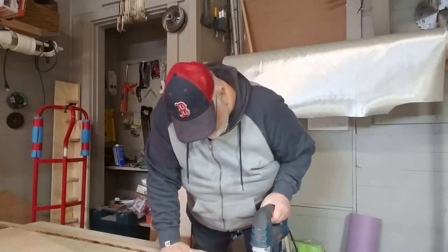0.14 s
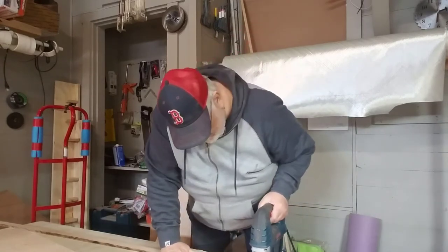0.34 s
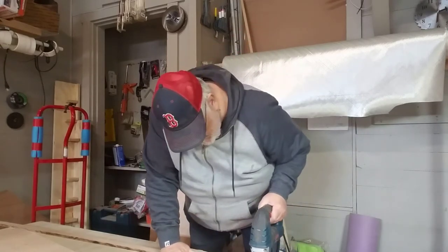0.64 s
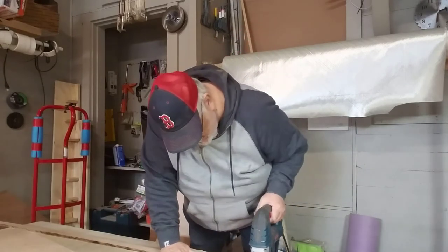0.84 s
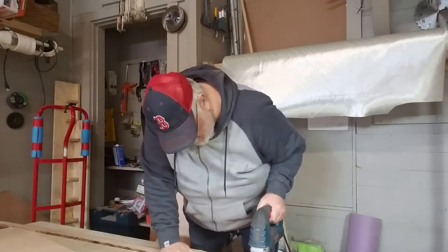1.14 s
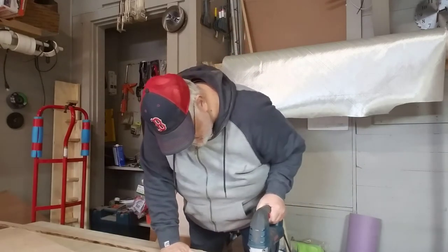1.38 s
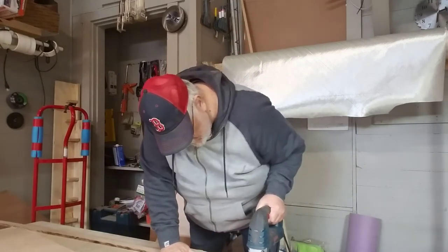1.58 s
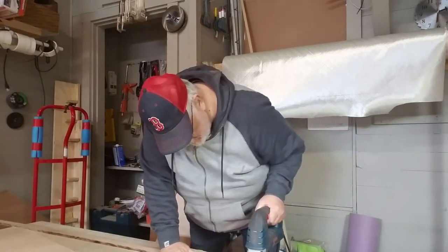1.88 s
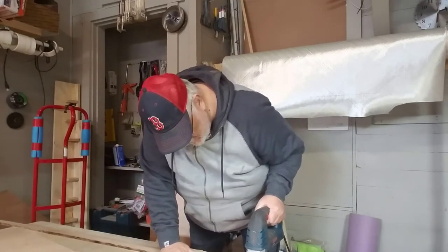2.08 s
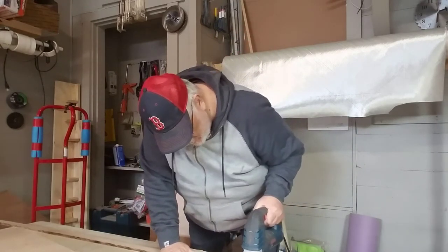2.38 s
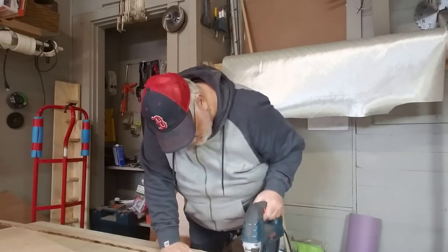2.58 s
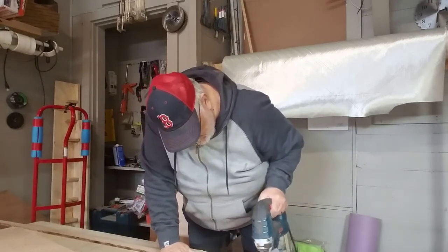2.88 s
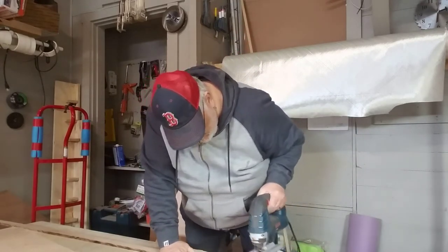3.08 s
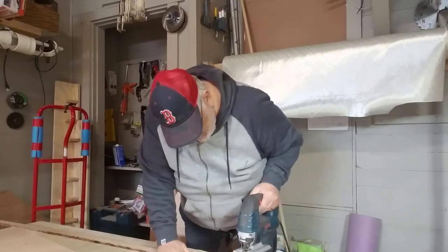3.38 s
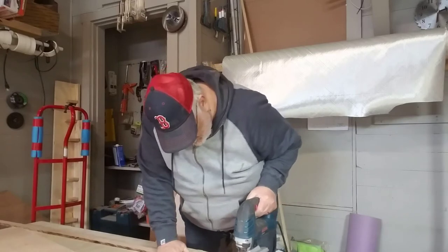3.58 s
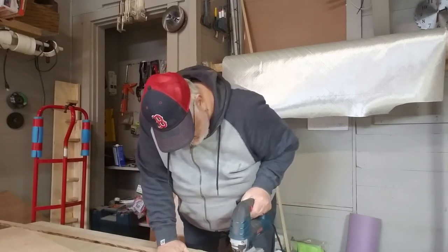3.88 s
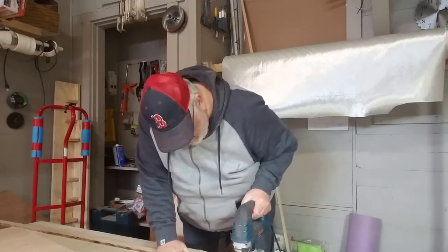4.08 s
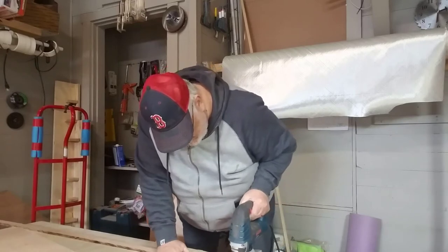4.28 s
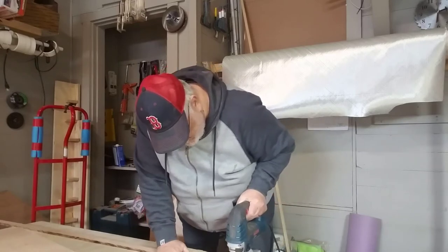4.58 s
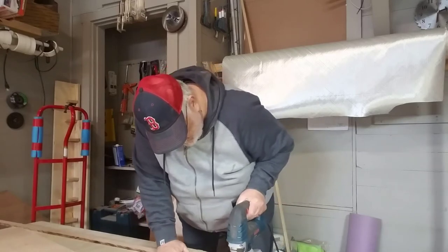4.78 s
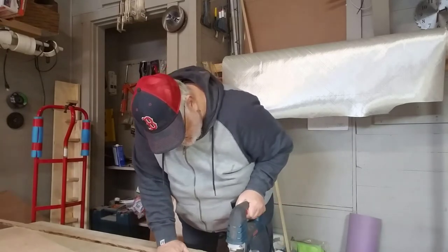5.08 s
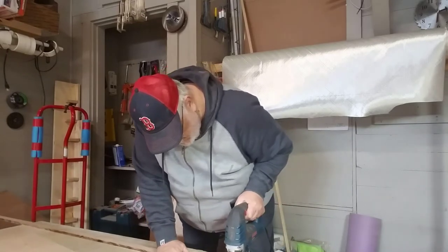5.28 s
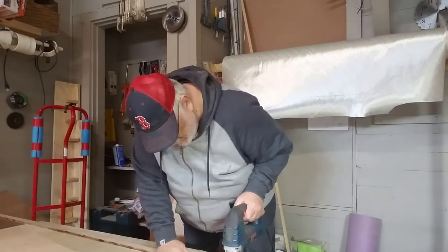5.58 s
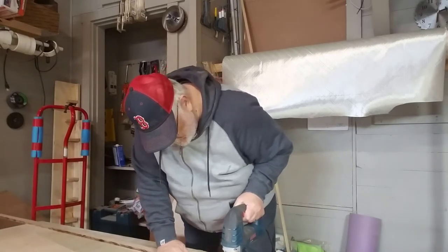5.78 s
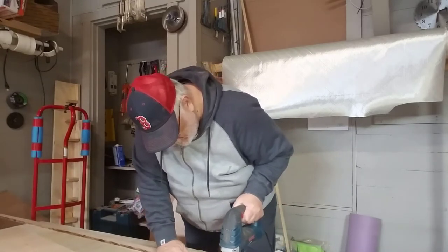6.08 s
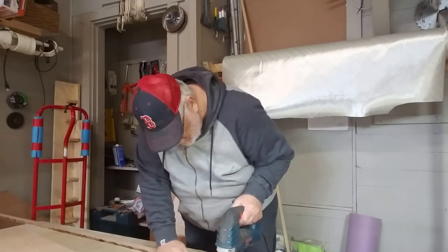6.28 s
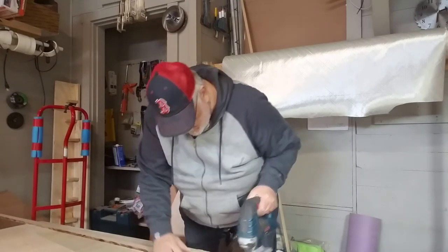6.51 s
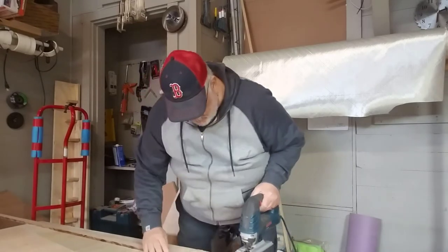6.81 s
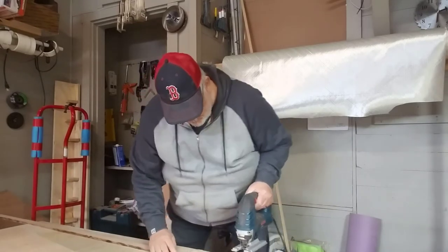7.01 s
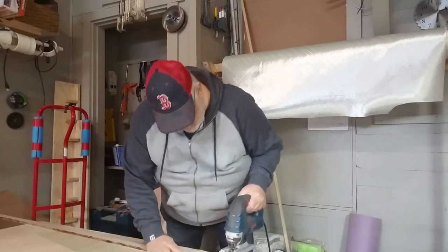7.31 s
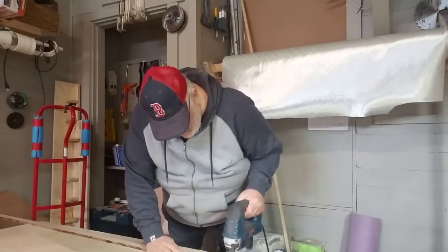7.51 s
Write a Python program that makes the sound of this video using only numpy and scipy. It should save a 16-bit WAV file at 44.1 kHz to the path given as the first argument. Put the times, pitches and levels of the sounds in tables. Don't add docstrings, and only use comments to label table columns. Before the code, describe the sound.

A close stereo pickup in a moderately echoing garage begins with faint room air and a barely audible high lamp tone. At about 0.85 s a jigsaw snaps on, biting wood with a loud, rough buzz, rapid blade chatter, fan hiss and brief squeals, rising slightly in pitch until 2.55 s. The offcut drops with a dense wooden clatter and low bench boom until 2.8 s, while the motor rattles and whines downward. Light shoe touches come at 3.3 s, heavier set-down knocks at 3.8 and 4.1 s, then fading settling taps from 4.4 to 4.8 s. A near-quiet pause ends around 4.95 s with a hard kick and a second rasping cut, squealing and jolting near 6.0 s. It stops at 6.35 s; a small scrap knocks and is quickly stilled, the motor winds down, and the shoe taps the bench at 7.3 s.

```python
import sys
import numpy as np
from scipy import signal
from scipy.fft import rfft, irfft, next_fast_len
from scipy.io import wavfile

SR = 44100
rng = np.random.default_rng(int(sys.argv[2]) if len(sys.argv) > 2 else 0)


def bounce(signal):
    frames = np.transpose(np.atleast_2d(signal))
    limited = np.clip(frames, -1, 1)
    pcm = np.round(limited * 32767).astype(np.int16)
    wavfile.write(sys.argv[1], SR, pcm)


def gain_from_decibels(decibels):
    exponent = np.asarray(decibels, float) / 20
    return 10 ** exponent


N = 337360

GEAR_TEETH, PINION_TEETH, ROTOR_SLOTS = 41, 4, 38
ROTOR_PER_STROKE = GEAR_TEETH / PINION_TEETH
# [t/s, level/dB]
CUTS = [
    [(.8, -64), (.832, -52), (.852, -20), (.954, -21), (1.11, -18), (1.866, -18.5), (2.55, -24)],
    [(4.964, -62), (4.982, -15), (5.032, -32), (5.04, -18.5), (5.388, -18), (5.896, -19.5), (6.058, -17.5),
     (6.074, -20), (6.352, -25)],
]
# [pulled t/s, released t/s, run-up time/s]
RUNS = [
    (.833, 2.575, .15),
    (4.932, 6.335, .13),
]


def clock():
    return np.arange(N) / SR


def rms_one(x):
    return x / np.sqrt(np.mean(x ** 2) + 1e-20)


def in_time(spans):
    gain = 0
    for span in spans:
        times, levels = np.transpose(span)
        gain = gain + gain_from_decibels(np.interp(clock(), times, levels, left=-200, right=-200))
    return gain


def at_hz(points, hz):
    points = np.array(points)
    return np.interp(np.log(hz + 1), np.log(points[:, 0]), points[:, 1])


def colour(x, spectrum):
    size = next_fast_len(N)
    gain = gain_from_decibels(at_hz(spectrum, np.fft.rfftfreq(size, 1 / SR)))
    return irfft(rfft(x, size) * gain, size)[..., :N]


def drift(rate_hz):
    r = np.exp(-2 * np.pi * rate_hz / SR)
    noise = rng.standard_normal(N + SR)
    return rms_one(signal.lfilter([1], [1, -2 * r, r * r], noise)[SR:])


def resonance(x, hz, width):
    r = np.exp(-np.pi * width / SR)
    poles = [1, -2 * r * np.cos(2 * np.pi * hz / SR), r * r]
    return signal.lfilter([(1 - r * r) / 2, 0, (r * r - 1) / 2], poles, x)


def ring(clicks, hz, t60):
    r, w = gain_from_decibels(-60 / (t60 * SR)), 2 * np.pi * hz / SR
    return signal.lfilter([0, np.sin(w)], [1, -2 * r * np.cos(w), r * r], clicks + 1e-18)


def rough_tone(turns, width):
    return drift(width) * np.cos(2 * np.pi * turns) + drift(width) * np.sin(2 * np.pi * turns)


def chips(strokes, per_s, upstroke, spread_db):
    beat = 1 + upstroke * np.cos(2 * np.pi * strokes) + 0.36 * np.cos(4 * np.pi * strokes + 1)
    sizes = gain_from_decibels(spread_db * np.minimum(rng.exponential(1, N), 4)) * rng.choice([-1, 1], N)
    return np.maximum(beat, 0) * sizes * (rng.random(N) < per_s / SR)


def garage():
    # [f/Hz, t60/s]
    room_t60 = [(100, 0.21), (500, 0.52), (2000, 0.47), (8000, 0.39)]
    t, echo = np.arange(SR // 2) / SR, 0
    for hz in 44 * 2. ** np.arange(9):
        band = signal.butter(2, [hz / np.sqrt(2), hz * np.sqrt(2)], "band", fs=SR, output="sos")
        noise = signal.sosfilt(band, rng.standard_normal((2, 2, len(t))))
        echo = echo + noise * gain_from_decibels(-60 * t / at_hz(room_t60, hz))
    return echo / np.sqrt(np.sum(echo ** 2) / 4) * np.clip(t / .006, 0, 1)


def placed(x, echo, wet_db):
    # [f/Hz, side minus mid level/dB]
    spread = [(60, -26), (110, -33), (200, -19.5), (380, -9.5), (700, -6), (1290, -1.5), (2380, -2.5),
              (4400, -2), (8120, 0.5), (15000, -0.5)]
    turn = 2 * np.pi * 2.6 * clock()
    moving = x * np.array([[np.cos(turn)], [np.sin(turn)]])
    wet = signal.fftconvolve(moving, echo, axes=2)
    mid, side = wet.sum(axis=0)[:, :N] * gain_from_decibels(wet_db)
    side = colour(side, spread) * np.sqrt(1 + gain_from_decibels(-2 * wet_db))
    return np.array([x + mid + side, x + mid - side]) / np.sqrt(1 + gain_from_decibels(2 * wet_db))


def speed():
    free, friction = 55.5, 34
    quick_share, creep_s, coast_s = .792, 1.657, 2.053
    out = np.zeros(N)
    for on, off, quick_s in RUNS:
        t = np.clip(clock(), on, off) - on
        lag = quick_share * np.exp(-t / quick_s) + (1 - quick_share) * np.exp(-t / creep_s)
        drag = np.exp(-np.maximum(clock() - off, 0) / coast_s)
        out += np.maximum((free * (1 - lag) + friction) * drag - friction, 0)
    return out + 1e-3


def load_surge():
    surges = [-6, 10]
    surge_s = .45
    out = np.zeros(N)
    for (on, _, _), db in zip(RUNS, surges):
        out += db * np.exp(-np.maximum(clock() - on, 0) / surge_s) * (clock() > on)
    return out


def feed_over_light(feed):
    return feed / gain_from_decibels(-25.5)


def room_floor(echo):
    # [f/Hz, level/dB]
    air_spectrum = [(15, -28), (25, 2), (128, -16), (237, -10), (488, -16), (637, -22), (1210, -21),
                    (7090, -36), (9770, -42), (11200, -35), (15000, -39)]
    air = rms_one(colour(rng.standard_normal(N), air_spectrum))
    ballast = gain_from_decibels(-92) * rough_tone(11200 * clock(), 30)
    return gain_from_decibels(-66.8) * placed(air, echo, wet_db=6) + ballast


def thuds():
    # [t/s, peak level/dB, f/Hz, t60/s]
    booms = [
        (2.58, -36, 61.5, 0.7),
        (2.78, -44, 74, 0.88),
        (3.311, -41, 100, 0.48),
        (3.77, -33.5, 74.6, 0.99),
        (4.114, -37, 70.7, 0.61),
        (6.36, -60, 78, 0.33),
        (7.32, -42, 61, 0.67),
        (7.352, -39, 106, .4),
    ]
    out = np.zeros(N)
    for s, db, hz, t60 in booms:
        t = np.maximum(clock() - s, 0)
        out += gain_from_decibels(db - 60 * t / t60) * (1 - np.exp(-t / 0.0057)) * np.sin(2 * np.pi * hz * t)
    return out


def shake(strokes):
    # [centre t/s, half length/s, level/dB]
    strong_swells = [
        [(1.85, .3, -53), (5.92, 0.21, -49.5)],
        [(1.35, 0.17, -50), (1.9, 0.16, -49.5), (2.3, 0.1, -47), (5.3, 0.18, -45.5), (5.72, .22, -37.5)],
        [(1.85, 0.19, -40.5), (2.3, 0.087, -39), (5.22, .07, -31.5), (5.5, 0.18, -38.5), (5.95, 0.12, -35.5)],
        [(1.32, .14, -32.5), (1.69, 0.042, -41), (2.29, 0.09, -42), (5.3, 0.2, -35), (5.68, 0.082, -35.5)],
        [(1.49, 0.051, -34), (1.78, .16, -38), (2.28, .25, -38), (5.42, .17, -32.5), (6.16, 0.093, -35.5),
         (6.33, 0.035, -40)],
    ]
    # [multiple of the stroke, level/dB]
    weak_lines = [(2, -63.5), (3, -68.5), (5, -51.5), (8, -52.5), (9, -54), (10, -47.5), (11, -54.5),
                  (12, -42), (13, -45.5), (14, -45.5)]
    fall_db = 8
    out, t = 0, clock()[::100]
    for k, swells in zip([1, 4, 6, 7, ROTOR_PER_STROKE], strong_swells):
        gain = sum(gain_from_decibels(db - fall_db * ((t - s) / half) ** 2) for s, half, db in swells)
        line = np.sin(2 * np.pi * k * strokes) + 0.39 * rough_tone(k * strokes, 8.8)
        out = out + np.interp(clock(), t, gain) * line
    weak = sum(gain_from_decibels(db - 6.5) * rough_tone(k * strokes, 5.6) for k, db in weak_lines)
    turning = np.clip(np.gradient(strokes) * SR / 28, 0, 1)
    return gain_from_decibels(1.0) * out + weak * rms_one(in_time(CUTS)) * turning


def knocks():
    # [t/s, peak level/dB, crack level/dB, ring f/Hz]
    offcut = [(2.556, -14, 11, 235), (2.579, -8, -6, 321), (2.599, -16, 6, 217), (2.624, -9, -5, 334),
              (2.647, -9.5, -7, 192), (2.664, -11.5, -13, 468), (2.689, -16.5, -20, 281),
              (2.736, -25.5, 14.5, 248), (2.754, -15.5, -8, 310), (2.801, -24, -10, 204),
              (2.829, -31, -11, 495), (6.359, -12.5, 5, 214), (6.374, -11, 5, 223),
              (6.399, -20.5, 12.5, 228), (6.431, -23, 0, 214), (6.459, -27, 10, 215), (6.5, -19.5, -8, 215)]
    shoe = [
        (3.307, -30.5, -8, 173),
        (3.351, -28.5, -4, 193),
        (7.311, -33.5, -13.5, 143.8),
        (7.334, -22.5, -23, 153),
        (7.354, -30, -15, 158),
        (7.379, -29.5, -12, 191),
    ]
    set_down = [
        (3.766, -24.5, 6, 215),
        (3.816, -25, -3, 460),
        (3.832, -18.5, -2, 475),
        (3.855, -16, 5, 507),
        (4.102, -30, -8, 300),
        (4.114, -13, -2, 372),
        (4.13, -17, -8, 480),
    ]
    settle = [
        (4.409, -33, -3, 307),
        (4.432, -36, -14, 322),
        (4.472, -41, -21.5, 292),
        (4.523, -47.5, -22, 308),
        (4.716, -54, -26, 220),
        (4.745, -55, -26, 290),
        (4.773, -55, -25, 200),
        (4.819, -56, -22, 290),
    ]
    kick = [
        (.85, -29, -12, 180),
        (4.982, -12, -6, 310),
        (5.038, -17, 5, 365),
        (5.076, -17.5, 4, 324),
        (5.106, -17, -.5, 370),
    ]
    # [treble level/dB, t60/s, ring level/dB, rise/s]
    offcut_sound = (-8, .125, -2.5, 0)
    shoe_sound = (-2, 0.09, -2.5, .003)
    set_down_sound = (-16, 0.14, -5, -0.02)
    settle_sound = (-11, .14, 2, .001)
    kick_sound = (4.3, .15, -5, .001)
    # [f/Hz, level/dB, t60/s]
    wood = [(215, -0.5, 1.2), (468, 5, 0.58), (657, -21, 2.2), (1060, -11, 0.66), (1293, -24, 0.22),
            (1890, -12.5, 0.99)]
    families = [(offcut, offcut_sound), (shoe, shoe_sound), (set_down, set_down_sound),
                (settle, settle_sound), (kick, kick_sound)]
    registers = [[110, 780], [480, 1630], [1500, 4070]]
    low, mid, high = [signal.butter(2, edges, "band", fs=SR, output="sos") for edges in registers]
    out, t = np.zeros(N), np.arange(SR // 2) / SR
    push = np.exp(-t / 0.0005) / 18
    crack = 1 + 1.2 * np.exp(-t / .005)
    blows = [tuple(row) + tuple(sound) for rows, sound in families for row in rows]
    for s, db, crack_db, hz, treble_db, t60, ring_db, rise in blows:
        t60 = max(t60, .02)
        grit = rng.standard_normal(len(t)) * gain_from_decibels(-60 * t / t60) * (1 - np.exp(-t / max(rise, 1e-4)))
        body = signal.sosfilt(low, grit)
        blow = gain_from_decibels(6) * body + gain_from_decibels(crack_db + 1.5) * signal.sosfilt(mid, grit * crack)
        blow += gain_from_decibels(treble_db - 8) * signal.sosfilt(high, grit)
        blow += gain_from_decibels(ring_db) * ring(body / 40 + push, hz, .45 * t60)
        for (m_hz, m_db, m_t60), luck_db in zip(wood, rng.normal(0, 2.2, len(wood))):
            blow += gain_from_decibels(crack_db + m_db + luck_db - 17.0) * ring(push, m_hz, min(m_t60, .07))
        at = round(s * SR)
        out[at:at + len(t)] += gain_from_decibels(db + 1) * blow[:N - at]
    thin = signal.butter(3, 115, "high", fs=SR, output="sos")
    return signal.sosfilt(thin, out)


def squeals(strokes):
    # [start t/s, end t/s, f/Hz, level/dB]
    songs = [(.845, .96, 312, -25), (.846, 0.923, 970, -28.5), (.855, .925, 2553, -26),
             (.986, 1.096, 2580, -28), (1.043, 1.197, 4880, -32), (1.063, 1.154, 3060, -33.5),
             (1.144, 1.455, 1843, -33), (1.3, 1.577, 3890, -32), (1.394, 1.596, 983, -33),
             (1.823, 1.99, 4320, -27.5), (1.845, 2.216, 3990, -31), (3.402, 3.787, 697, -49.5),
             (3.45, 3.59, 2200, -43), (4.975, 5.072, 311, -32), (4.975, 5.2, 383.7, -34),
             (5.03, 5.16, 2500, -27.5), (5.23, 5.3, 2500, -34), (5.28, 5.56, 3870, -45),
             (5.923, 6.085, 4200, -29), (5.95, 6.092, 4880, -33.5), (6.378, 6.516, 211.4, -33),
             (7.552, 7.608, 2100, -45)]
    out = np.zeros(N)
    for start, end, hz, db in songs:
        a, b = round(start * SR), round(end * SR)
        width = .055 * hz
        rub = rng.standard_normal(SR)[:b - a] * (1 + 0.45 * np.cos(2 * np.pi * strokes[a:b]))
        song = rms_one(resonance(resonance(rub, hz, width), hz, width))
        out[a:b] += gain_from_decibels(db) * song * signal.windows.tukey(b - a, .4)
    return out


def blows_and_squeals(strokes, echo):
    drop_s, drop_for_s, drop_db = 6.525, .7, -15
    lowered = np.clip((clock() - drop_s) / 0.024, 0, 1) * (clock() < drop_s + drop_for_s)
    return gain_from_decibels(drop_db * lowered) * placed(knocks() + squeals(strokes), echo, wet_db=-1.5)


def mesh(strokes, multiple, width):
    band = rough_tone(multiple * GEAR_TEETH * strokes, width)
    return rms_one(band * (1 + 0.3 * np.cos(2 * np.pi * strokes)))


def rattle(strokes):
    # [f/Hz, level/dB per Hz]
    gearbox = [(65, -50), (110, -31), (249, -18.5), (442, -9), (535, -9.5), (682, -3.5), (1110, -7.5),
               (1490, -3), (3200, -2.5), (3950, -17), (7000, -34.5), (9100, -19), (15400, -120)]
    let_go_db, let_go_s = 7, 0.22
    out = rms_one(colour(chips(strokes, per_s=9000, upstroke=0.19, spread_db=4.5), gearbox))
    out += gain_from_decibels(-11.5) * (mesh(strokes, 0.99, width=73) + 0.36 * mesh(strokes, 2.2, width=86))
    let_go = np.zeros(N)
    for on, off, _ in RUNS:
        let_go += let_go_db * np.exp(-np.maximum(clock() - off, 0) / let_go_s) * (clock() > on)
    return gain_from_decibels(1.0 + let_go) * out


def fan_hiss(strokes, rate):
    # [f/Hz, level/dB per Hz]
    air_rush = [(2350, -11.5), (4000, -2.5), (4610, -4), (8390, -9), (9400, -11), (13100, -6.5),
                (15100, -5.5), (15600, -21.5)]
    hiss = rms_one(colour(chips(strokes, per_s=20000, upstroke=0.08, spread_db=5.0), air_rush))
    slack = np.clip(1 - rate / 30, 0, 1)
    top = signal.sosfilt(signal.butter(1, 7000, "high", fs=SR, output="sos"), hiss)
    return hiss - 0.85 * slack * top


def fan_gain(rate, feed, coast):
    # [t/s, level/dB]
    jolts = [
        (.85, -28.5),
        (.935, -33),
        (4.109, -35.5),
        (4.409, -65),
        (4.98, -39),
        (6.0, -26),
    ]
    jolt_t60 = 0.4
    over = feed_over_light(feed)
    powered = gain_from_decibels(-26.5 - .3 * load_surge() + 26.5 * np.log10(rate / 50))
    powered = np.minimum(over, 1) * powered / np.maximum(over, 1) ** 0.27
    dust = 0
    for s, db in jolts:
        dust = dust + gain_from_decibels(db - 60 * np.maximum(clock() - s, 0) / jolt_t60) * (clock() >= s)
    return np.hypot(powered + coast, dust)


def whine(strokes, rate, feed):
    # [f/Hz, level/dB]
    whine_by_pitch = [(3500, -62.5), (5400, -50), (7600, -48.5), (10000, -56), (11800, -49), (13300, -35.5),
                      (15200, -35.5), (17000, -54)]
    slots_per_stroke = ROTOR_PER_STROKE * ROTOR_SLOTS
    turns = strokes * slots_per_stroke
    tone = rms_one(np.sin(2 * np.pi * turns) + .9 * rough_tone(turns, 130))
    powered_db = 4 * np.minimum(feed_over_light(feed), 1)
    gain = gain_from_decibels(at_hz(whine_by_pitch, rate * slots_per_stroke) + powered_db)
    return tone, gain * np.clip(rate / 9, 0, 1) ** 4


def motor(strokes, rate, feed, echo):
    # [t/s,
    # level/dB]
    coasts = [
        [(2.55, -33.5), (2.87, -37.5), (3.15, -43.5), (3.42, -39.5), (3.72, -43.5), (3.85, -41), (4.09, -52),
         (4.3, -66), (4.6, -86)],
        [(6.352, -37.5), (6.5, -34), (6.58, -37.5), (6.76, -41), (6.93, -42.5), (7.28, -39), (7.65, -46)],
    ]
    coast = in_time(coasts)
    out = 0
    tone, tone_gain = whine(strokes, rate, feed)
    out = out + coast * rattle_in_room(strokes, echo)
    out += fan_gain(rate, feed, coast) * placed(fan_hiss(strokes, rate), echo, wet_db=14.5)
    return out + tone_gain * placed(tone, echo, wet_db=-8)


def rattle_in_room(strokes, echo):
    return placed(rattle(strokes), echo, wet_db=4.0)


def bite(strokes):
    # [f/Hz, level/dB per Hz]
    tearing = [(53, -55), (90, -51.5), (236, -32), (300, -14.5), (401, -15.5), (499, -8.5), (556, -15.5),
               (787, -6.5), (877, -7), (1790, -2), (4050, -9.5), (7000, -24.5), (9100, -27.5),
               (15400, -120)]
    # [f/Hz, width/Hz, level/dB]
    board = [(299.6, 11, 1.5), (503, 33, -7.5), (750, 130, -4), (985, 22, 0), (1480, 29, -13),
             (2500, 85, -9), (2843, 80, -2.5)]
    torn = chips(strokes, per_s=6000, upstroke=0.52, spread_db=4.0)
    modes = sum(gain_from_decibels(db - 2.5 + 6.2 * drift(11)) * resonance(torn, hz, width) for hz, width, db in board)
    return rms_one(colour(torn + modes, tearing))


def cut(strokes, rate, feed):
    running = np.minimum(feed_over_light(feed), 1)
    gear_gain = running * np.clip(rate / 18, 0, 1) ** 2 * gain_from_decibels(-28.5 + load_surge())
    return feed * bite(strokes) * gain_from_decibels(-2.0) + gear_gain * mesh(strokes, 0.98, width=135)


def scene():
    rate = speed()
    strokes = np.cumsum(rate) / SR
    echo, feed = garage(), in_time(CUTS)
    bench = (shake(strokes) + thuds()) * gain_from_decibels([[-.3], [.3]])
    out = room_floor(echo) + bench + blows_and_squeals(strokes, echo)
    out += motor(strokes, rate, feed, echo)
    return out + placed(cut(strokes, rate, feed), echo, wet_db=1.0)


def band_limit(x):
    return signal.sosfilt(signal.butter(12, 16950, fs=SR, output="sos"), x)


def record(dry):
    dry = signal.sosfilt(signal.butter(2, 45, "high", fs=SR, output="sos"), dry)
    dry = signal.sosfilt(signal.cheby2(14, 60, 16250, fs=SR, output="sos"), dry)
    right = colour(dry[1], [(300, 1.0), (2000, -0.67), (12000, -1.4)])
    return band_limit(np.array([dry[0], right]))


dry = scene()
out = record(dry)
bounce(out)
```